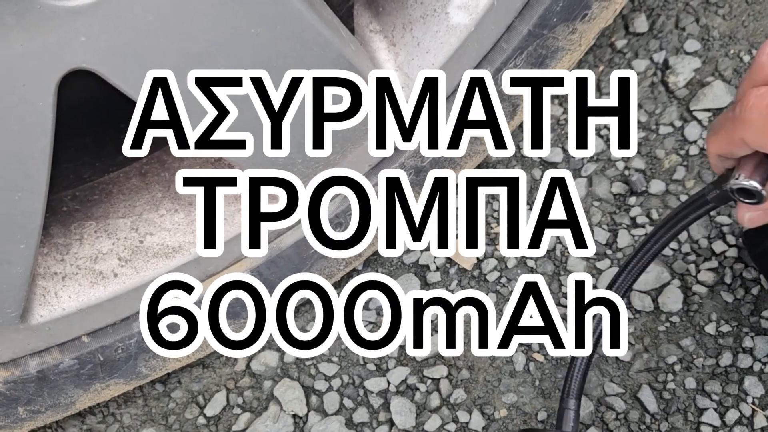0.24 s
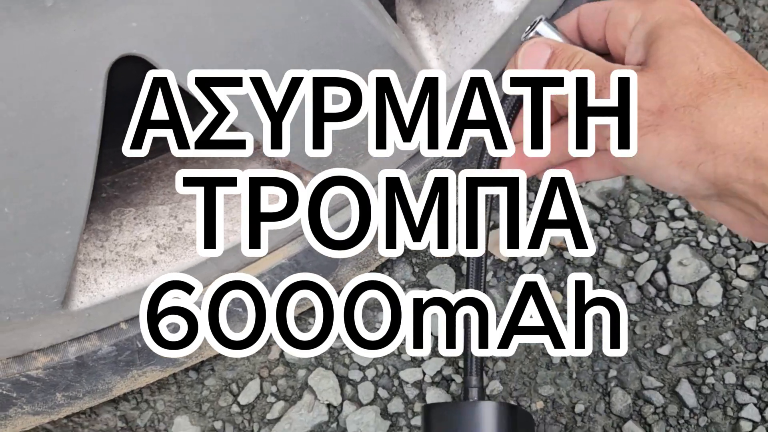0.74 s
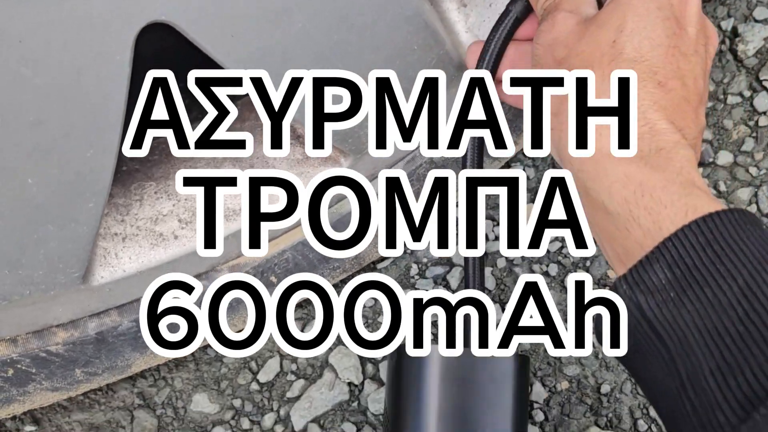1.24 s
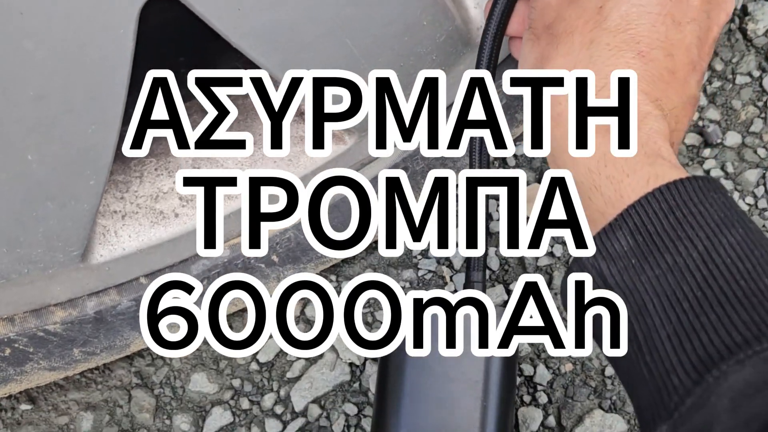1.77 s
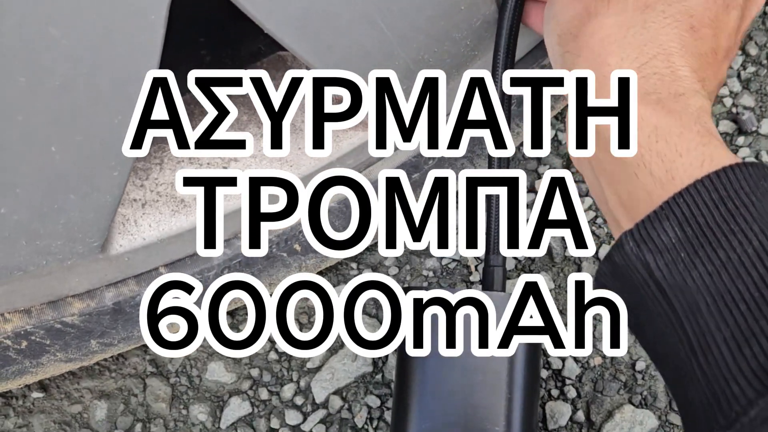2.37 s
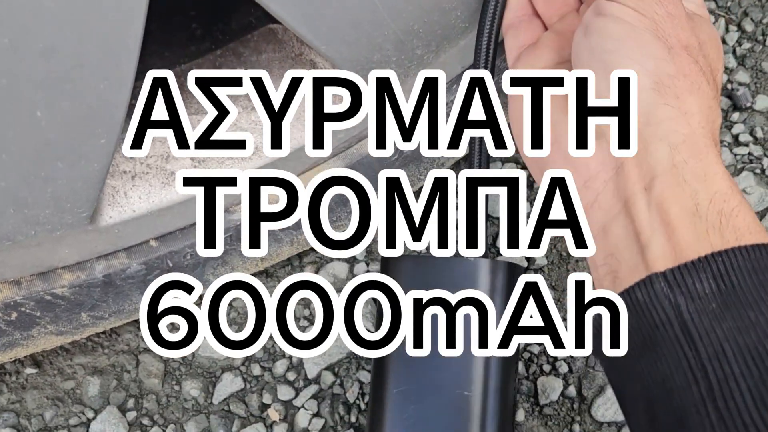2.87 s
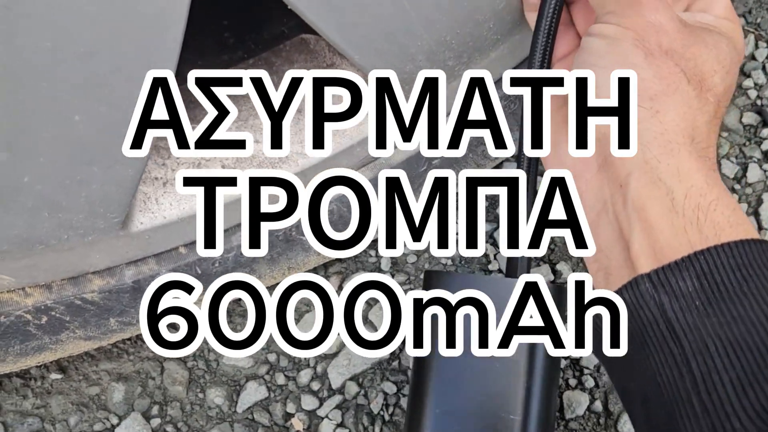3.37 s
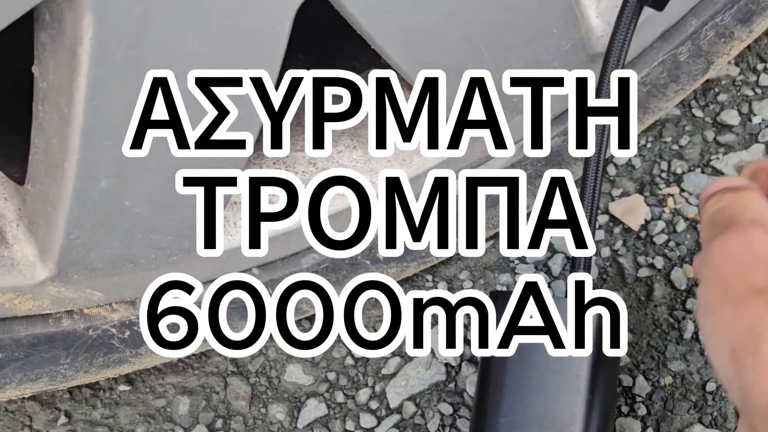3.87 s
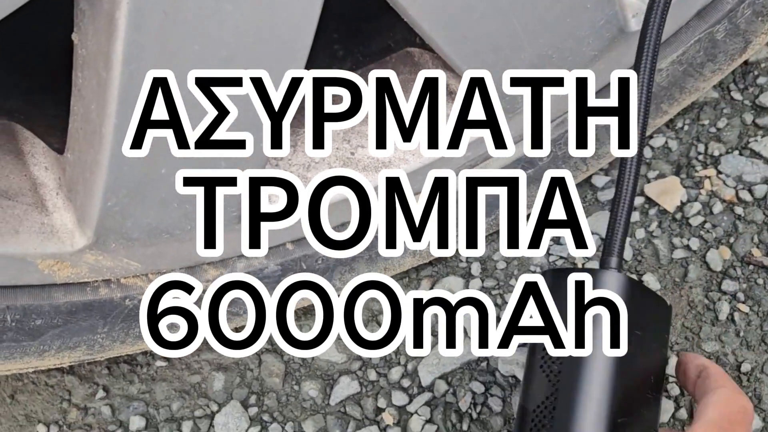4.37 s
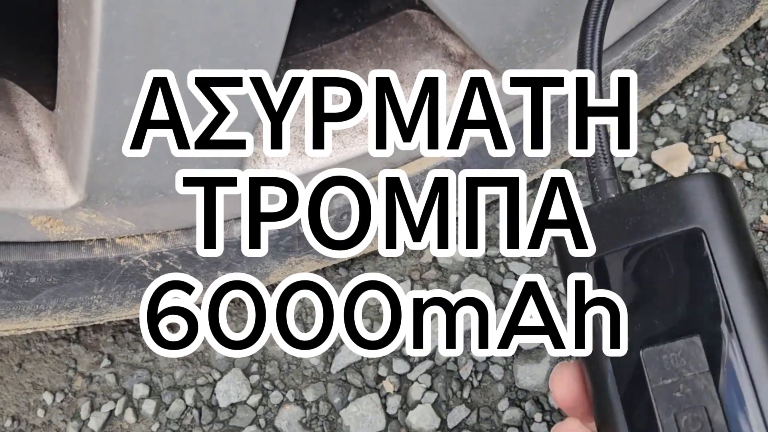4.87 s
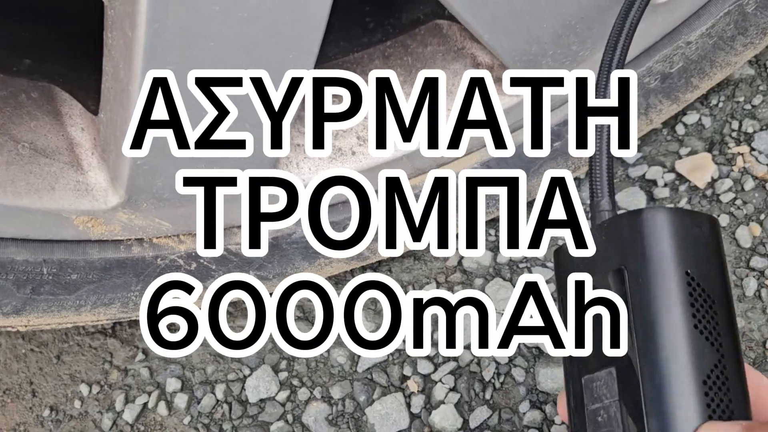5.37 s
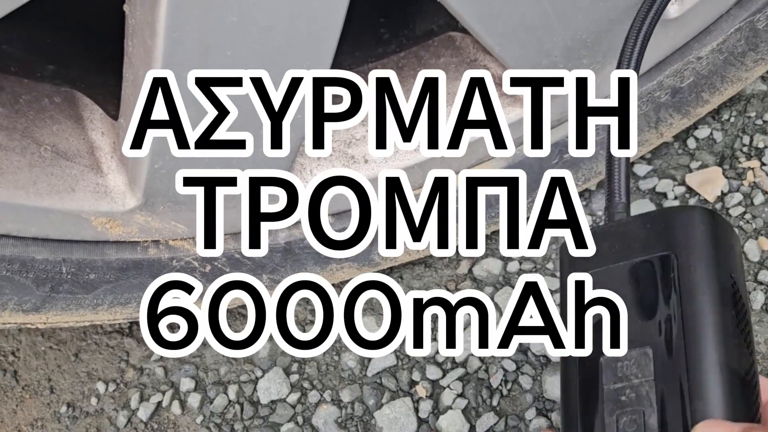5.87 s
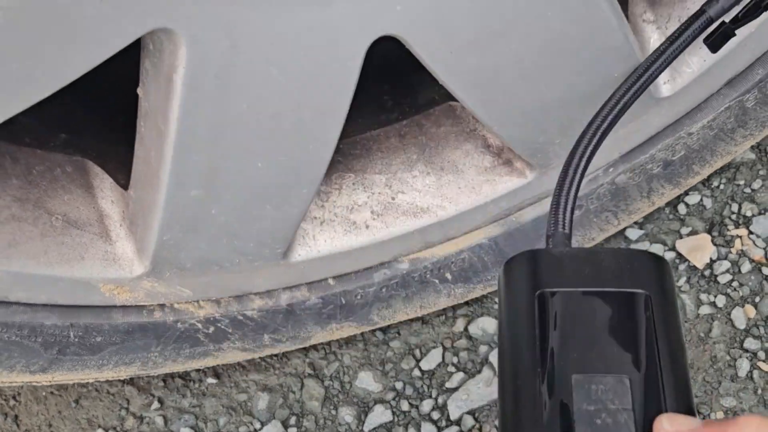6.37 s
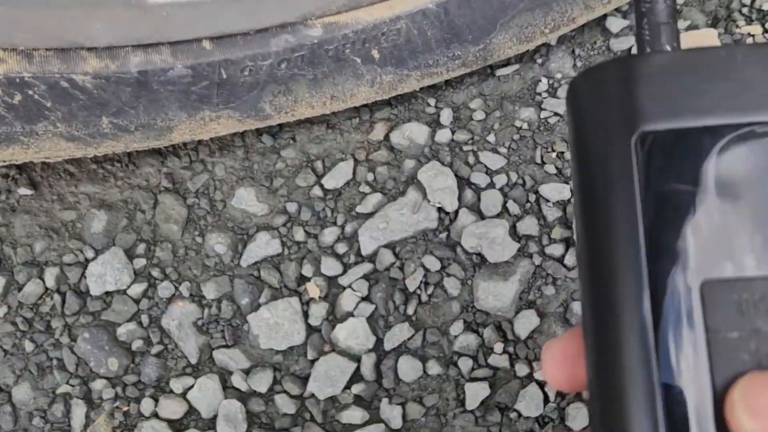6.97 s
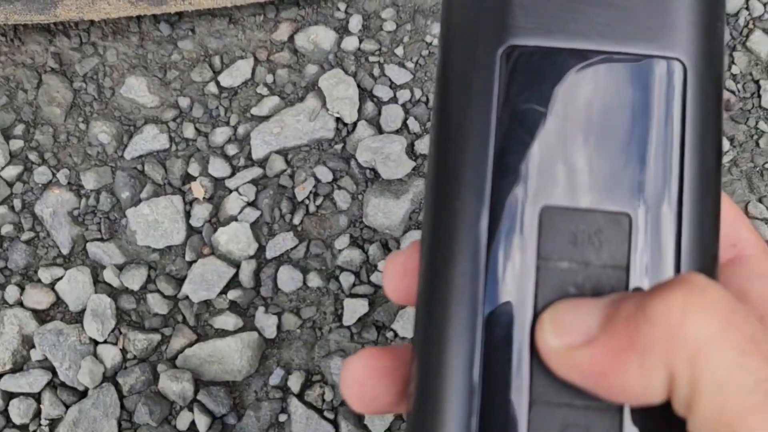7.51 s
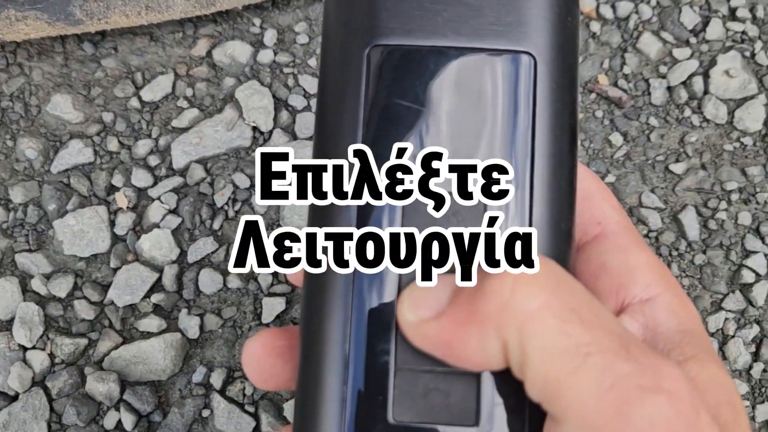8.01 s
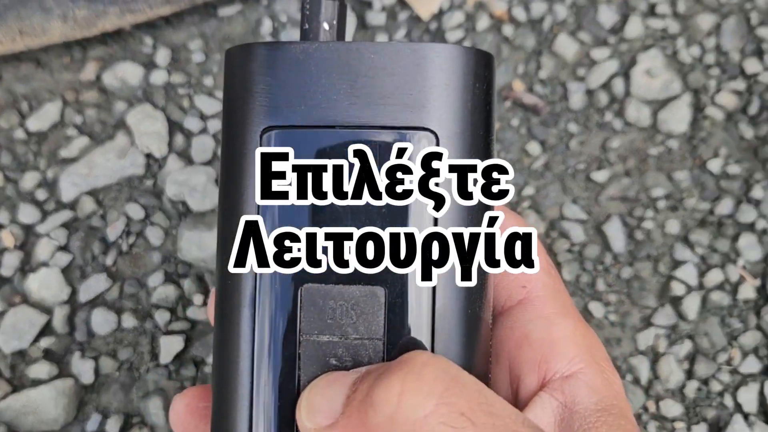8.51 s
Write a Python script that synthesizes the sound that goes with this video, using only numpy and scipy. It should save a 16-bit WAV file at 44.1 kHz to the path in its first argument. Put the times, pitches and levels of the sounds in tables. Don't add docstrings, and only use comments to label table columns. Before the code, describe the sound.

A phone close to a car wheel outdoors picks up a screw-on hose fitting clicking and scraping on a tyre valve, with low engine hum receding behind. Air suddenly hisses out loudly, fluttering and bright, and stops almost at once as the seal closes. Nails then tick on the hose, a palm rubs and creaks the plastic case, and two firmer clicks sound near the end over faint road rumble.

```python
import sys
import numpy as np
from scipy import signal
from scipy.fft import rfft, irfft
from scipy.io import wavfile
from scipy.ndimage import uniform_filter1d, minimum_filter1d, map_coordinates

SR = 44100
rng = np.random.default_rng(int(sys.argv[2]) if len(sys.argv) > 2 else 0)


def how_loud(loudness_db):
    steps = np.asarray(loudness_db, float) / 20
    return 10 ** steps


def int16_out(signal):
    q = np.round(np.clip(np.atleast_2d(signal).T, -1, 1) * 32767)
    wavfile.write(sys.argv[1], SR, q.astype(np.int16))


N = 385786

# start_s, tyre_roar_db
ROAD_LEVEL = [(0, -41), (1.07, -40.5), (1.68, -43), (2.02, -45.5), (2.53, -45), (3.12, -48.5), (4.04, -50),
              (5.14, -51.5), (6.94, -51), (7.14, -49.5), (7.43, -51.5), (8.75, -52)]
# pitch_hz, left_right_db
NO_LEAN = [(20, 0), (20000, 0)]


def rms_one(x):
    return x / np.sqrt(np.mean(x ** 2) + 1e-20)


def in_time(rows):
    s, *columns = np.transpose(rows)
    return [np.interp(np.arange(N) / SR, s, c) for c in columns]


def at_hz(points, hz):
    table = np.array(points)
    return np.interp(np.log(hz), np.log(table[:, 0]), table[:, 1])


def swells(rows):
    t = np.arange(N) / SR
    return sum(height * np.exp(-(2 * (t - s) / length) ** 2 / 2) for s, length, height in rows)


def drift(rate, size):
    r = np.exp(-80 * np.pi * rate / SR)
    slow = signal.lfilter([1], [1, -2 * r, r * r], rng.standard_normal(size // 40 + 2002))[2000:]
    return np.interp(np.arange(size) / 40, np.arange(len(slow)), rms_one(slow))


def band_filter(x, edges_hz, kind="band", order=2):
    return signal.sosfilt(signal.butter(order, edges_hz, kind, fs=SR, output="sos"), x)


def resonance(x, hz, width):
    r = np.exp(-np.pi * width / SR)
    return signal.lfilter([(1 - r * r) / 2, 0, (r * r - 1) / 2], [1, -2 * r * np.cos(2 * np.pi * hz / SR), r * r], x)


def moving_resonance(x, hz, width):
    turn = np.exp(2j * np.pi * np.cumsum(hz) / SR)
    r = np.exp(-np.pi * width / SR)
    return 2 * (signal.lfilter([1 - r], [1, -r], x / turn) * turn).real


def left_later(pair, lag_ms):
    w = 2 * np.pi * np.fft.rfftfreq(pair.shape[1], 1 / SR) * lag_ms / 1000
    return np.array([irfft(rfft(pair[0]) * np.exp(-1j * w), pair.shape[1]), pair[1]])


def bands(spectrum, likeness, lean, patchy_db, flicker, size):
    lowest, highest = spectrum[0][0], spectrum[-1][0]
    edges = np.geomspace(lowest, highest, int(3 * np.log2(highest / lowest)) + 1)
    white = rng.standard_normal((2, 2, size))
    out = []
    for k, (low, high) in enumerate(zip(edges, edges[1:])):
        if at_hz(spectrum, low) < -65:
            break
        mid, side = band_filter(white[k % 2], [low, high])
        hz = np.sqrt(low * high)
        alike = np.clip(at_hz(likeness, hz), 0, 1)
        gain = how_loud(at_hz(spectrum, hz) + patchy_db * drift(flicker, size))
        gain = gain * how_loud(at_hz(lean, hz) * np.array([[.5], [-.5]]))
        out.append(gain * (np.sqrt(1 + alike) * mid + np.sqrt(1 - alike) * side * [[1], [-1]]))
    out = np.array(out)
    centres = np.sqrt(edges[1:] * edges[:-1])[:len(out)]
    return centres, out / np.sqrt(np.mean(out.sum(0).mean(0) ** 2))


def air_jet():
    # start_s, level_db
    flow = [
        (2.17, -85),
        (2.205, -62.5),
        (2.208, -48),
        (2.252, -17),
        (2.33, -16),
        (3.052, -18),
        (3.076, -54.5),
        (3.084, -62),
        (3.14, -87),
    ]
    # start_s, cover_0_to_1
    hand_cover = [(2.214, 0.56), (2.33, 0.16), (2.534, 0.94), (2.7, 0.5), (3.036, 0.16)]
    # start_s, shade_0_to_1, mouth_hz
    thumb_shade = [(2.25, .3, 6000), (2.35, .1, 6100), (2.43, .8, 6520), (2.52, .9, 6785), (2.62, .9, 6450),
                   (2.7, .5, 5900), (2.78, .4, 5900), (2.86, .1, 6356), (3.05, .05, 6500)]
    # start_s, lower_hz, lower_gain, upper_hz, upper_gain
    chuck_tilt = [(2.26, 8800, .6, 12900, 0.84), (2.4, 8700, .5, 12930, .8), (2.48, 9100, 1.2, 13440, 1.1),
                  (2.6, 8900, .2, 13220, 0.55), (2.75, 8600, 1.1, 12600, .2), (2.9, 8640, .7, 12900, 0.64),
                  (3.05, 8700, .7, 12890, .6)]
    # pitch_hz, level_db (per Hz)
    jet_colour = [(410, -58), (700, -29.5), (1080, -40), (1180, -26.5), (2190, -13.5), (2370, -18),
                  (2840, -17), (3900, -6.5), (4800, -1.5), (6230, -8), (7390, 1), (8880, -2.5),
                  (9600, -6.5), (12500, -5), (14800, -8.5), (16000, -14)]
    # pitch_hz, likeness_0_to_1
    near_likeness = [(700, .48), (2000, .5), (4000, .5), (6000, .68), (8000, .55), (15000, .5)]
    # pitch_hz, left_right_db
    jet_lean = [(700, 0.5), (4400, 0.5), (8000, 2.5), (15000, 5)]
    first, size = int(2.1 * SR), int(1.1 * SR)
    during = slice(first, first + size)

    def swell(s, length, height):
        return swells([(s, length, height)])[during]

    curves = in_time(flow) + in_time(hand_cover) + in_time(thumb_shade) + in_time(chuck_tilt)
    jet_db, cover, shade, mouth_hz, lower_hz, lower, upper_hz, upper = [c[during] for c in curves]

    low_db = -13 + 4.5 * cover + 0.48 * (jet_db.max() - jet_db) - swell(2.45, 0.17, 2.51) - swell(2.98, .2, 2.5)
    top_db = 2.5 - 5.5 * cover
    centres, parts = bands(jet_colour, near_likeness, jet_lean, patchy_db=.7, flicker=5.0, size=size)
    low, top = centres < 3300, centres > 10000
    jet = rms_one(parts[~low & ~top].sum(0))
    jet = jet + how_loud(low_db) * rms_one(parts[low].sum(0)) + how_loud(top_db) * rms_one(parts[top].sum(0))

    since = (first + np.arange(size)) / SR - flow[3][0]
    whistle_hz, whistle_db = 7340 + 140 * since, -10 + 10.5 * since
    wobble = rng.standard_normal((2, 2, size)) + rng.standard_normal((2, 1, size))
    wobble = signal.lfilter([1], [1, -.982], wobble)
    phase = 2 * np.pi * np.cumsum(whistle_hz) / SR
    whistle = rms_one(wobble[0] * np.cos(phase) + wobble[1] * np.sin(phase))

    cavity = (0.25 + .7 * cover) * resonance(jet, 5070, 740) + .5 * resonance(jet, 8130, 300)
    cavity += swell(2.5, .25, .4) * resonance(jet, 4500, 1100) + .5 * since * resonance(jet, 9800, 300)
    cavity += 0.25 * shade * moving_resonance(jet, mouth_hz, 500)
    cavity += lower * moving_resonance(jet, lower_hz, 350) + upper * moving_resonance(jet, upper_hz, 450)
    cavity += 0.4 * (1 - shade) * resonance(jet, 10250, 300)
    shadow = .6 * shade * resonance(jet, 10300, 900) + .5 * resonance(jet, 9700, 400)
    shadow += .4 * resonance(jet, 10750, 400) + 0.5 * resonance(jet, 7000, 250)
    shadow += 0.16 * resonance(jet, 12010, 900) + swell(2.47, .15, .6) * resonance(jet, 15000, 2500)
    shadow += swell(2.3, .2, .3) * resonance(jet, 7500, 1490) + swell(2.97, .28, .5) * resonance(jet, 6000, 1300)
    palm = swell(2.68, 0.15, .9) * resonance(jet, 1200, 300)

    sound = echoed(jet + cavity - shadow + palm) + how_loud(whistle_db) * whistle
    flutter_db = 0.87 * drift(40, size=size)
    out = np.zeros((2, N))
    out[:, during] = how_loud(jet_db + 0.5 + flutter_db) * left_later(sound, lag_ms=-.26)
    return out


def echoed(pair):
    # delay_ms, level_db
    echo_paths = [
        (1.7, -20.5),
        (3.1, -12.5),
        (5.3, -11.5),
    ]
    size, out = pair.shape[1], pair.copy()
    now = np.arange(size)
    for delay_ms, level_db in echo_paths:
        path_ms = delay_ms + 0.0358 * drift(2.2, size=size)
        for k in range(2):
            heard = now - (path_ms + 0.027 * k) * SR / 1000
            out[k] += how_loud(level_db) * map_coordinates(pair[k], [heard], order=3)
    sway_ms = .025 * drift(1.2, size=size)
    out[0] = map_coordinates(out[0], [now + sway_ms * SR / 1000], order=3)
    return out * np.std(pair) / np.std(out)


def ticks():
    # start_s, peak_db, pitch_hz, body_db (against the crack)
    chuck_ticks = [(.093, -44, 7800, 3), (.187, -42, 8300, -6), (.2638, -37.5, 2540, 13.5),
                   (.376, -39, 2870, 6), (.487, -31, 7110, -12), (.7403, -34.5, 2795, -17),
                   (.798, -29.5, 7390, -21), (.835, -39.5, 3350, -4), (1.1357, -38, 5447, -6),
                   (1.149, -20, 9000, -21), (1.1827, -33, 7000, 0), (1.198, -39, 12000, -12),
                   (1.2181, -31, 8720, 0), (1.2408, -28, 8800, -1.5), (1.293, -14.5, 3300, -0.5),
                   (1.2945, -29, 4800, -12), (1.3792, -40, 3310, -6), (1.4037, -26.5, 3030, -4),
                   (1.413, -29, 3280, -11), (1.4228, -25, 3000, -14), (1.4314, -24.5, 4700, -11),
                   (1.4394, -27, 5030, -19), (1.455, -37, 10990, -8), (1.4934, -32.5, 3410, -6),
                   (1.5, -34, 9000, -4), (1.621, -43, 2918, -5), (1.783, -57, 8000, -12),
                   (1.9225, -33, 4770, -8), (1.94, -36, 11000, -15), (1.955, -42, 4980, -5),
                   (2.0333, -41.5, 5250, -7), (2.0702, -34, 7830, -7), (2.1196, -44, 7970, -10)]
    # start_s, peak_db, pitch_hz, body_db
    hose_ticks = [(3.1567, -39, 2650, -5), (3.1924, -39.5, 3080, -4.5), (3.158, -54, 9000, -15),
                  (3.2344, -52, 7500, -12), (3.339, -37.5, 2590, -11), (3.3598, -33.5, 4700, -13.5),
                  (3.3727, -38.5, 8400, 3), (3.386, -41, 4500, -4.5), (3.41, -49, 6000, -15),
                  (3.5658, -45, 4340, -4), (3.8067, -36, 5180, -16), (3.8245, -36, 4680, -25),
                  (4.0883, -41, 9000, -10), (4.1215, -44, 2680, -1), (4.1535, -30.5, 5730, -30),
                  (4.2083, -29, 4370, -7), (4.2453, -34.5, 6150, -2), (4.2692, -40, 2500, 3),
                  (4.2785, -43, 4600, -14), (4.6573, -49, 2720, 6)]
    # start_s, peak_db, pitch_hz, body_db
    case_ticks = [(5.6053, -39.5, 4350, -5), (5.619, -43, 9000, -8), (5.6456, -43, 2870, -8),
                  (5.7717, -48, 2600, -5), (5.7987, -51, 2500, -5), (5.9254, -38.5, 3920, -13),
                  (5.953, -41, 2770, -11), (5.9868, -33.5, 8450, -21), (6.0173, -35, 2950, -12),
                  (6.062, -35, 3220, -6), (6.1134, -49, 2500, 4), (6.1444, -50, 2690, 13),
                  (6.4196, -51, 4890, -7), (6.4527, -48, 2500, 6), (6.469, -39, 2740, 9.5),
                  (6.4793, -27.5, 4130, 4), (6.4796, -33.5, 11700, -10), (6.6204, -42, 2800, 8),
                  (7.07, -29, 8060, -14), (7.071, -32.5, 6000, -20)]
    out, t = np.zeros((2, N)), np.arange(4000) / SR
    places = [(chuck_ticks, -2), (hose_ticks, 1), (case_ticks, -4)]   # table, left_right_db
    rows = [(*row, pan_db) for table, pan_db in places for row in table]
    sprays = rng.standard_normal((len(rows), 2, len(t)))
    for (s, peak_db, hz, body_db, pan_db), spray in zip(rows, sprays):
        top_db = -23 + 7 * np.log2(hz / 3300.0) - 0.64 * body_db
        fade_s = 0.027 * how_loud(0.045 * (peak_db + 42))
        burst = (spray[0] + 0.92 * spray[1] * [[1], [-1]]) * how_loud(-60 * t / fade_s)
        burst = burst * (1 - np.exp(-t / 0.0005)) ** 2
        crack = band_filter(burst, [max(2600, .5 * hz), min(12000, 2.13 * hz)]) + 4.3 * resonance(burst, hz, 890)
        top = band_filter(burst, 9800, "high", order=4)
        body = resonance(resonance(burst, 1920, 1300), 1920, 1300)
        tick = crack / np.abs(crack).max()
        tick = tick + how_loud(body_db + 1.0) * body / np.abs(body).max()
        tick = tick + how_loud(top_db + 4.0) * top / np.abs(top).max()
        start = round(s * SR)
        out[:, start:start + len(t)] += how_loud(peak_db) * tick * how_loud([[pan_db / 2], [-pan_db / 2]])
    return out


def snaps():
    # start_s, peak_db, top_tilt_db
    snap_times = [(0.7395, -39, 12), (1.147, -30, -5), (1.2935, -15.5, -7), (1.5025, -32, -2),
                  (4.1523, -26, 2.5), (4.2085, -42, -3), (4.2285, -52, 0), (5.9523, -45, 0),
                  (5.9867, -32, 1), (6.4801, -32, 3), (7.071, -50, 9)]
    out, t = np.zeros((2, N)), np.arange(1500) / SR
    sprays = rng.standard_normal((len(snap_times), 2, len(t)))
    for (s, peak_db, tilt_db), spray in zip(snap_times, sprays):
        burst = spray[0] + 0.47 * spray[1] * [[1], [-1]]
        burst = burst * how_loud(-60 * t / 0.017) * (1 - np.exp(-t / 0.0011))
        snap = band_filter(burst, [1900, 7500]) + how_loud(tilt_db + 2) * band_filter(burst, 7500, "high")
        start = round(s * SR)
        out[:, start:start + len(t)] += how_loud(peak_db) * snap / np.abs(snap).max()
    return out


def rubbing():
    # pitch_hz, level_db (per Hz)
    rub_colour = [(1180, -32.5), (2000, -3.5), (2460, 0.5), (3040, -7.5), (3810, -4.5), (4690, -6.5),
                  (5390, -1), (8780, 0), (9660, -6.5), (12200, -12), (14000, -8.5), (16000, -14)]
    # pitch_hz, likeness_0_to_1
    skin_likeness = [(1000, .3), (3000, .2), (15000, .15)]
    # start_s, level_db, left_right_db, top_brightness_db
    far_hiss = [(0, -63, 0, -4), (.3, -56, 3, -3), (.7, -64.5, -1, -3), (1.0, -73, -1, -1),
                (2.2, -83, 2, 2), (3.1, -70.5, 0, -1.5), (3.48, -87, 0, 3), (3.6, -67.5, -1, 0),
                (3.9, -81.5, 0.5, 3), (4.9, -70.5, -2, 1), (5.12, -78.5, 1, 2.5), (5.8, -60.5, -2.5, 0),
                (6.95, -63, -4, 0), (7.2, -71, -4, -4), (7.6, -77.5, -4, -5), (7.95, -71.5, -5, -5),
                (8.05, -66.5, -4.5, -1), (8.75, -66, -3, -2)]
    # start_s, length_s, level_db, pressure_db (strength of the dull part)
    rub_strokes = [(0.049, 0.051, -67.5, 24), (0.482, 0.013, -50, 5), (0.794, 0.011, -66.5, 26),
                   (1.067, 0.032, -70, 4), (1.093, .05, -54.5, 8), (1.13, 0.14, -45.5, 9),
                   (1.265, 0.053, -46, 15), (1.31, 0.088, -55, 14), (1.388, 0.12, -48.5, 9.5),
                   (1.564, 0.026, -61.5, 8), (1.739, 0.053, -72, 8), (1.904, 0.049, -58, 5),
                   (1.935, 0.047, -59, 16.5), (2.022, .07, -78, 11), (2.111, 0.045, -68, 1),
                   (3.145, .025, -76, 6), (3.227, 0.021, -67.5, 6), (3.33, .022, -66, 6),
                   (3.367, 0.026, -51, 14), (3.56, 0.018, -80, 1), (3.684, 0.15, -78, -8.5),
                   (3.813, 0.058, -54, 10.5),
                   (4.084, 0.062, -56.5, 2), (4.136, 0.17, -63, 15), (4.486, .056, -76, -2),
                    (4.642, 0.078, -59, 6), (4.781, 0.025, -74, -1), (4.98, 0.11, -54, 3),
                    (5.166, 0.038, -60, 0), (5.267, 0.034, -69, -7), (5.333, 0.057, -61, -8.5),
                    (5.398, 0.064, -68, -11), (5.524, 0.041, -51.5, -7), (5.663, 0.085, -58.5, -2),
                    (5.808, 0.097, -59.5, -8), (5.932, 0.079, -60, 5), (6.113, 0.068, -61.5, -6),
                    (6.272, .11, -53.5, 7.5), (6.445, 0.15, -63.5, 18), (6.557, 0.044, -53.5, 1),
                    (6.59, .084, -70, 7), (6.735, 0.11, -76.5, -9), (6.99, .037, -68, 4),
                    (7.112, 0.02, -79, 16)]
    # pitch_hz, width_hz, level_db
    case_modes = [(3160, 350, -13), (4500, 190, -8), (6000, 390, -14), (5100, 180, -32), (7270, 300, -12),
                  (9000, 450, 1.5), (10980, 1200, -8.5), (12530, 760, -5.5), (14450, 1200, -8)]
    centres, parts = bands(rub_colour, skin_likeness, NO_LEAN, patchy_db=2.1, flicker=9.8, size=N)
    ranges = [(5000, 9600), (0, 5000), (9600, SR)]
    layers = [rms_one(parts[(centres > low) & (centres < high)].sum(0)) for low, high in ranges]

    haze_db, pan_db, bright_db, roar_db = in_time(far_hiss) + in_time(ROAD_LEVEL)
    dull = np.hypot(how_loud(haze_db + 2.64), how_loud(roar_db - 21.5))
    haze = how_loud(haze_db) * (layers[0] + how_loud(bright_db - 5) * layers[2]) + dull * layers[1]

    power = np.zeros((3, N))
    grain = how_loud(1.8 * drift(70, size=N) + 6 * np.clip(drift(300, size=N) - .9, 0, 1))
    for s, length, level_db, dull_db in rub_strokes:
        top_db = -1.1 - 0.17 * dull_db
        span = slice(max(round((s - .06) * SR), 0), round((s + length + .06) * SR))
        away = np.arange(span.start, span.stop) / SR - s - length / 2
        outside = np.maximum(np.abs(away) - 0.4 * length, 0)
        outside = outside * np.where(away < 0, .7, 1)
        layer_db = np.array([[0], [dull_db - 8.5], [top_db]])
        power[:, span] += (grain[span] * how_loud(level_db - 1.5 - 1600 * outside + layer_db)) ** 2
    rub = sum(np.sqrt(p) * layer for p, layer in zip(power, layers)) + 1e-18

    rings = 0
    for hz, width, level_db in case_modes:
        grip_db = 2.7 * np.clip(drift(20, size=N), -2, 1.4)
        rings = rings + how_loud(level_db + grip_db) * resonance(rub, hz, width)
    pan = how_loud(pan_db * np.array([[.5], [-.5]]) - 1.5)
    return left_later((haze + 0.79 * rub + rings) * pan, lag_ms=.25)


def squeaks():
    # start_s, length_s, level_db, pitch_hz
    squeak_times = [(0.049, 0.06, -58, 4030), (0.37, 0.026, -51, 2960), (1.103, .045, -63, 9000),
                    (1.18, 0.055, -54, 12500), (1.398, 0.023, -49, 9000), (1.438, 0.034, -52, 4940),
                    (1.455, 0.02, -52, 11000), (1.915, .03, -60, 12720), (2.035, .025, -69, 9000),
                    (3.04, 0.012, -28, 3820), (3.37, 0.019, -58, 4500), (3.575, 0.1, -71, 4700),
                    (3.6, .05, -76, 8500), (3.83, .035, -58, 5600), (3.831, 0.032, -56.5, 3920),
                    (3.825, .04, -61, 14600), (4.085, .04, -66, 9000), (4.084, 0.049, -65, 7500),
                    (4.156, 0.04, -60, 5700), (4.277, .01, -67, 12000), (5.008, .08, -66, 4500),
                    (5.349, .03, -57, 9000)]
    width_hz = 429
    out = np.zeros((2, N))
    noises = rng.standard_normal((len(squeak_times), 2, 8000))
    for (s, length, level_db, hz), noise in zip(squeak_times, noises):
        size = round(1.4 * length * SR)
        sung = rms_one(resonance(resonance(noise, hz, width_hz), hz, width_hz))[:, -size:]
        start = round((s - 0.26 * length) * SR)
        out[:, start:start + size] += how_loud(level_db + 2.0) * sung * np.sqrt(np.hanning(size))
    return out


def knocks():
    # start_s, peak_db, pitch_hz
    knock_times = [(.499, -32.5, 119), (.579, -31.5, 104.3), (1.293, -32.5, 670), (1.292, -30, 1350),
                   (1.4239, -27.5, 1290), (1.428, -33, 1270), (1.564, -24.5, 115.8), (1.57, -28.5, 231.7),
                   (1.73, -27.5, 231), (1.803, -33, 800), (1.811, -33, 900), (1.998, -32.5, 109),
                   (2.284, -32.5, 190), (2.999, -35, 101.3), (2.999, -32, 200), (6.063, -45, 1550),
                   (6.1445, -43, 1750), (6.479, -30.5, 750), (6.4795, -37, 600), (6.4802, -25, 2110),
                   (7.941, -42, 780), (8.117, -37.5, 827)]
    out, t = np.zeros(N), np.arange(8000) / SR
    for s, peak_db, hz in knock_times:
        cycles = hz * t
        shape = how_loud(peak_db + 9.5 - 60 * cycles / 16) * (1 - np.exp(-3 * cycles))
        start = round(s * SR)
        out[start:start + len(t)] += shape * np.sin(2 * np.pi * cycles)
    return out


def engine():
    # start_s, firing_hz, level_db
    engine_run = [(0, 137.4, -38.5), (.2, 135.1, -44), (.33, 120.1, -36), (.45, 103.8, -35.5),
                  (.62, 101.5, -52), (.76, 107.2, -34), (.93, 106.4, -40.5), (1.15, 108.9, -37),
                  (1.4, 109.8, -42), (1.62, 113.5, -47), (1.75, 113.9, -45), (2.0, 119.6, -49)]
    hz, level_db = in_time(engine_run)
    phase = 2 * np.pi * np.cumsum(hz) / SR
    second = how_loud(-7.5 + 2.7 * drift(26.0, size=N)) * np.sin(2 * phase + 1.3 * drift(13.0, size=N))
    hum = np.sqrt(2) * how_loud(level_db + 2.5) * (np.sin(phase) + second)
    return hum * how_loud([[-.9], [.9]]) * (np.arange(N) < 2 * SR)


def road():
    # pitch_hz, level_db (per Hz)
    rumble_colour = [(12, -46), (20, -10), (43, -3), (81, 1.5), (102, 0), (118, -8), (182, -8),
                     (269, -13.5), (343, -24.5), (500, -24.5), (650, -53.5), (1100, -120)]
    roar_colour = [(150, -29), (250, -4), (354, -7.5), (398, -11), (490, -10.5), (702, -8.5), (753, -15.5),
                   (1080, -12.5), (1640, -15), (2140, -25.5), (4000, -40), (5200, -68.5), (8800, -120)]
    # pitch_hz, likeness_0_to_1
    far_likeness = [(30, .9), (130, .83), (290, .82), (640, .52), (1400, .38), (4000, .25)]
    # pitch_hz, left_right_db
    roar_lean = [(150, 0.5), (350, 0.5), (600, 1), (1200, 0.8), (4000, 1.5)]
    # start_s, length_s, rise_db
    rumble_swells = [(1.6, 0.29, 5), (2.95, 0.36, 2.5), (5.5, 0.27, 2.5), (6.9, 0.33, 1.5), (8.1, 0.37, 4),
                     (8.6, 0.26, 2.5)]
    # start_s, length_s, rise_db
    drone_swells = [(.3, 0.86, 13.5), (1.7, 0.92, 10), (2.8, 0.43, 7.5), (3.8, 0.25, 5), (4.5, 0.79, 9.5),
                    (5.95, 0.28, 3), (7.7, 0.28, -1.5), (8.5, 0.51, 4)]
    roar_db, = in_time(ROAD_LEVEL)
    rumble_db = -42.5 + .35 * (roar_db - roar_db.min()) + swells(rumble_swells)
    drone_db = -12 + swells(drone_swells)
    rumble = bands(rumble_colour, far_likeness, NO_LEAN, patchy_db=0.07, flicker=9.0, size=N)[1].sum(0)
    roar = bands(roar_colour, far_likeness, roar_lean, patchy_db=.5, flicker=2.2, size=N)[1].sum(0)
    drone = rms_one(resonance(roar, 875, 120)) + 0.29 * rms_one(resonance(roar, 1407, 120))
    roar = roar + 0.93 * resonance(roar, 2100, 460)
    late_car = how_loud(swells([(7.7, 2.9, 18)]) - 20.5) * resonance(roar, 1060, 160)
    far = how_loud(roar_db + 2.0) * (roar + how_loud(drone_db) * drone + late_car) * how_loud([[-.4], [.4]])
    near_ground = how_loud(rumble_db + 4.0) * left_later(rumble, lag_ms=0.13) * how_loud([[-.8], [.8]])
    return near_ground + left_later(far, lag_ms=0.26)


def scene():
    return air_jet() + ticks() + snaps() + rubbing() + squeaks() + knocks() + engine() + road()


def patchy_bands(x, scatter_db, share, hole_db):
    hz, s, cells = signal.stft(x, SR, nperseg=2048, noverlap=1536)
    shape = (len(hz) // 6 + 1, len(s) // 3 + 1)
    patches = rng.random((2, *shape)).repeat(6, axis=1).repeat(3, axis=2)
    waver, lost = patches[:, :len(hz), :len(s)]
    bright = np.diff(x.mean(0), 2, append=[0, 0]) ** 2
    crest = uniform_filter1d(bright, 64) / (uniform_filter1d(bright, 2048) + 1e-14)
    sharpest = -minimum_filter1d(-crest, 2048)
    steady = sharpest[np.minimum(s * SR, N - 1).astype(int)] < 4
    loud = np.mean(np.abs(cells[:, 150:]) ** 2, axis=(0, 1)) > how_loud(-125)
    pitch = hz[:, None]
    holes = (lost < share * np.where(pitch < 6500, 1, .1)) & loud & (pitch > 1300)
    holes = uniform_filter1d(1. * holes, 4, axis=1) > 0
    gain = how_loud(scatter_db * (2 * waver - 1) * (pitch > 200) * steady + hole_db * holes)
    return signal.istft(cells * gain, SR, nperseg=2048, noverlap=1536)[1][:, :N]


def roll_off(x):
    return signal.sosfilt(signal.butter(12, 16780, fs=SR, output="sos"), x)


def record(dry):
    coloured = np.tanh(dry - 0.33 * resonance(dry, 9450, 500))
    cut = signal.sosfilt(signal.ellip(12, .5, 66, 15700, fs=SR, output="sos"), coloured)
    mix = patchy_bands(cut, scatter_db=3.0, share=.075, hole_db=-31)
    return roll_off(mix)


dry = scene()
out = record(dry)
int16_out(out)
```